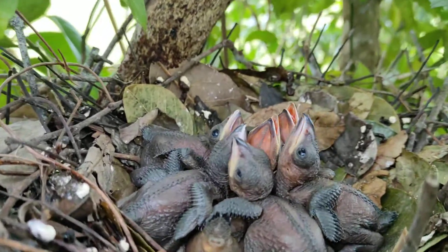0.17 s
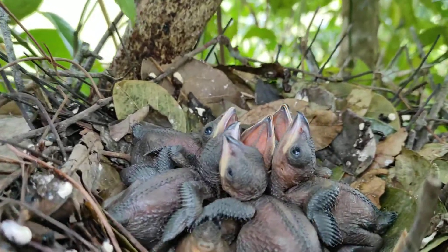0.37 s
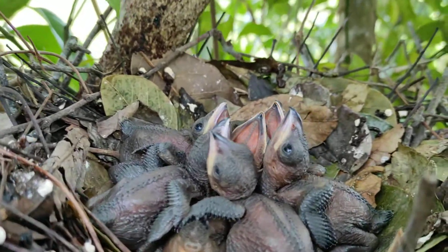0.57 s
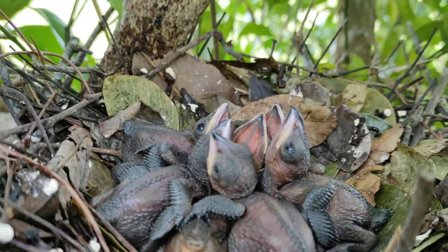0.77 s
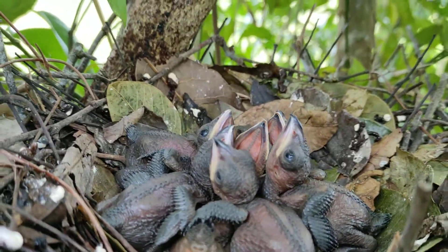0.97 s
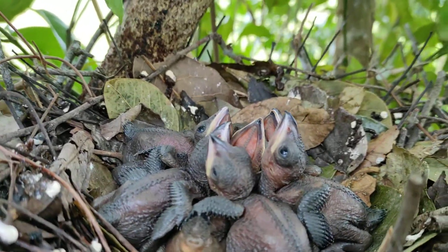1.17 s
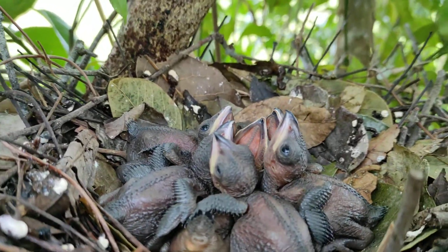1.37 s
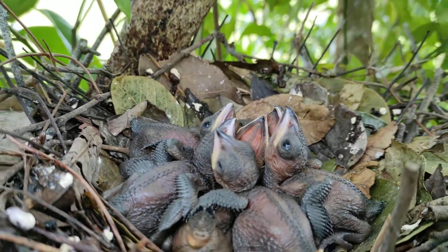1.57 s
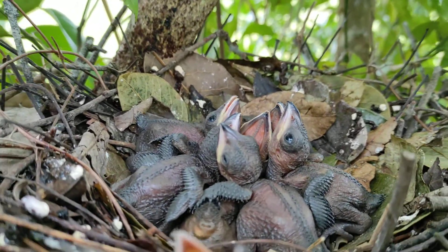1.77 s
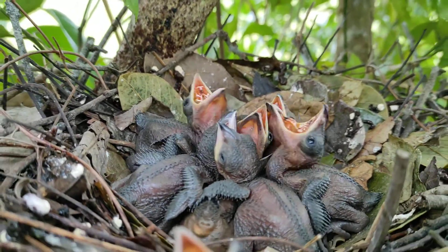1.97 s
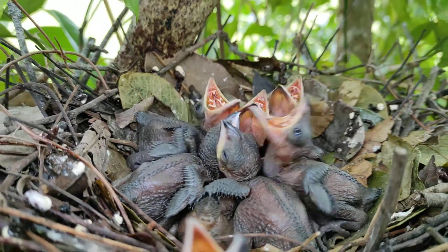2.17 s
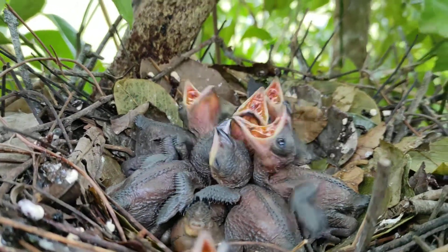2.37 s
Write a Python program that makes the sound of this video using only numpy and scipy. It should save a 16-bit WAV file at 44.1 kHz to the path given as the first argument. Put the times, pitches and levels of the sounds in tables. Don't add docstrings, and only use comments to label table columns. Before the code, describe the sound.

Begging nestlings close to a small camera: a short raspy hiss, a scatter of beak and twig clicks, a stronger hiss with thin rising whistles, then a final loud hiss, over a steady high insect whine outdoors.

```python
import sys
import numpy as np
from scipy import signal
from scipy.fft import rfft, irfft, next_fast_len
from scipy.io import wavfile
from scipy.ndimage import uniform_filter1d, map_coordinates

SR = 44100
rng = np.random.default_rng(int(sys.argv[2]) if len(sys.argv) > 2 else 0)


def attenuation_scalar(level_db):
    decades = np.asarray(level_db, float) / 20
    return 10 ** decades


def pcm_store(signal):
    levels = np.round(np.clip(np.atleast_2d(signal), -1, 1) * 32767)
    wavfile.write(sys.argv[1], SR, levels.astype(np.int16).T)


N = 107118

# t/s, level/dB
FIRST_HISS = [
    (0, -50.5),
    (.14, -51),
    (0.211, -53),
    (0.257, -68),
]
LONG_HISS = [
    (.87, -79),
    (.95, -58.5),
    (1.14, -44),
    (1.3, -46),
    (1.449, -45.5),
    (1.599, -46.5),
    (1.631, -48),
]
LAST_HISS = [
    (2.12, -77),
    (2.134, -56.5),
    (2.16, -50),
    (2.24, -44),
    (2.33, -42.5),
    (2.43, -44),
]
FAINT_HISS = [(0.711, -73.5), (.82, -62.5), (.89, -67.5), (.93, -56), (1.1, -64), (1.2, -58.5),
              (1.299, -59.5), (1.33, -63)]
SHORT_PUFF = [
    (1.99, -90),
    (2.029, -72.5),
    (2.061, -64.5),
    (2.075, -79),
]
HISS_TRIM_DB = [6.43, 3.02, 5.7, 4.2, 3.5]
HISS_RIGHT_TRIM_DB = [2.5, 6.45, 1.3, 11.7, 3.5]
# f/Hz, width/Hz, level/dB
LONG_GAPE = [(1600, 930, -6), (3150, 570, 6.5), (5610, 1400, -3), (7930, 1030, 0.5), (9175, 310, 6),
             (12300, 4300, -10.5)]
COMMON_GAPE = [(1660, 1230, -4), (3184, 860, 0.5), (4890, 750, -9), (8130, 810, -1), (9320, 130, -7),
               (11500, 320, -13)]
FAINT_GAPE = [(1806, 440, -2.5), (3140, 730, -2.5), (5100, 4800, -17)]
# f/Hz, width/Hz, level/dB
LONG_HISS_DIP = (2200, 360, -14)
# f/Hz, level/dB
HISS_RIGHT_DB = [(1000, -8), (3000, -23), (5500, -8.5), (9000, -15.5)]

# f/Hz, level/dB
AIR_COLOUR = [(500, -1.5), (1800, -10.5), (3200, -5.5), (4500, -15.5), (5500, -4), (9000, -3),
              (10200, -11.5), (15000, -12.5)]
# f/Hz, level/dB
AIR_RIGHT_DB = [(30, -12), (300, -16), (4500, -7.5), (9000, -53)]
# t/s, level/dB
SWAY = [
    (0, -60),
    (.3, -61),
    (.75, -66.5),
    (2.05, -64.5),
    (2.43, -55),
]
# f/Hz, level/dB
RUMBLE_COLOUR = [(12, -1.5), (25, -5), (170, -11), (700, -28), (1200, -90)]

# f/Hz, width/Hz, level/dB
CHORUS_PEAKS = [(6850, 419, 7), (6947, 538, 4)]

# t/s, peak level/dB, knock
# level/dB, bright ring level/dB
CLICKS = [(0.0095, -47, -3, -17), (0.063, -41.5, 0.5, -12), (0.2344, -43.5, -8.5, -1), (0.2588, -45, -8, 2),
          (0.2637, -46, -13, -2), (0.3272, -33.5, -15, -9), (0.3312, -31.5, -11, 4.5),
          (0.3328, -35, -11, -5), (0.342, -43.5, -4.5, -9), (0.346, -42.5, -5.5, -5),
          (0.353, -39.5, -14, -2), (0.3747, -46.5, -7.5, 1), (0.4087, -50, -5, -1.5), (0.4136, -48, -7, 1),
          (0.4395, -51, -7.5, 3), (0.4677, -45.5, -7.5, -6), (0.4883, -38.5, -17.5, -12),
          (0.5016, -33.5, -13, -18), (0.503, -37.5, -13, -6.5), (0.5077, -42.5, -8, -1),
          (0.523, -52, -2, -7), (0.5768, -37.5, -11, -7), (0.6082, -35, -23, 3.5), (0.617, -42.5, -4, -18),
          (0.6595, -39.5, -9, -13), (1.6589, -29.5, -9, -18), (1.6627, -28, -21, -7.5),
          (1.6687, -41, 2.5, -23), (1.6826, -43, -2.5, -8), (1.7157, -34.5, -22, -6.5),
          (1.72, -40, -11, -9), (1.776, -49, -6, -4), (1.815, -55.5, -12, -1), (2.055, -58.5, -8, 6)]
# f/Hz, width/Hz, level/dB
BEAK = [(1940, 1280, -3), (3260, 970, -0.5), (5870, 400, -7)]
BRIGHT_TWIG = [(7780, 1120, 12), (8940, 1400, -7)]
NEST_BOWL = [(95, 29.7, -4.5), (181.7, 31, -3), (332, 72, 0.5), (595, 336, -0.5)]

# t/s, f/Hz, level/dB, overtone level/dB
LONG_WHISTLE = [(.675, 656, -82, 6), (0.721, 926.5, -74, 12), (0.755, 1170, -66, 8),
                (.81, 1400, -69.5, 14.5), (0.85, 1650, -59, 6), (0.883, 1775, -53.5, 1.5),
                (.91, 1833, -57, -15), (.975, 1985, -47, -8), (1.001, 2052, -46, -10.5),
                (1.09, 2162, -36.5, -35), (1.142, 2205, -39, -33), (1.18, 2280, -47, -22),
                (1.26, 2357, -48, -28), (1.295, 2460, -47, -18)]
HIGH_WHISTLE = [
    (0.775, 1970, -61, -8),
    (0.811, 2398, -59, -6),
    (0.85, 2985, -53, -12),
    (0.879, 3260, -53.5, -18),
    (0.901, 3600, -41, -34),
    (0.981, 3710, -47, -20),
    (0.999, 3815, -56.5, -32),
    (1.1, 3940, -47, -28),
]
LOW_WHISTLE = [(1.17, 608.2, -78, -0.18), (1.237, 729.6, -62.5, 0.3), (1.265, 690, -66, 0.33),
               (1.294, 693.5, -61.5, .3), (1.329, 649.6, -63, .3), (1.356, 708, -58, 0.26),
               (1.398, 776, -64, 0.2), (1.441, 782.4, -57, 0.21), (1.472, 744, -58.5, 0.31),
               (1.497, 741.7, -58, .3), (1.56, 694, -62, 0.27), (1.593, 623, -66, 0.44),
               (1.62, 556, -66, 0.33)]
CHIRP = [
    (2.134, 9200, -70, 0),
    (2.149, 9900, -57, 0),
    (2.17, 10200, -54, 0),
    (2.19, 9900, -67.5, 0.0037),
]
# multiple of f, level/dB; the first ignores the overtone level
LONG_ORDERS = [(1, 0), (2, -5), (3, -5), (4, -14), (5, -7)]
HIGH_ORDERS = [(1, 0), (1 / 3, -12), (1 / 2, -6), (2 / 3, -10), (3 / 2, -6)]
LOW_ORDERS = [(2, 0), (3, 2), (4, 12), (5, 9), (6, 7), (7, 6), (8, 5)] + [(k, 4) for k in range(10, 13)]
# f/Hz, width/Hz, level/dB
WHISTLE_COLOURS = [
    [(5100, 900, -25), (3200, 700, 6)],
    [],
    [(2340, 160, -22)],
    [],
]
FLICKER_DB = [2.2, 2.6, 2.6, 9]
WAVER = [.003, .005, .007, .03]
WHISTLE_RIGHT_DB = [-8, -14, -18, -11]

# f/Hz, level/dB
AUDIBLE = [(2000, -116), (7400, -108), (8000, -90), (10100, -85), (12400, -94), (13500, -102), (15500, -89)]


def unit(x):
    return x / np.sqrt(np.mean(x ** 2) + 1e-20)


def along(points, hz):
    f, v = np.transpose(points)
    return np.interp(np.log(hz + 1), np.log(f + 1), v)


def curves(rows):
    s, *columns = np.transpose(rows)
    t = np.arange(N) / SR
    since_start = t - s[0] + (s[0] < .01)
    until_end = s[-1] - t + (s[-1] > 2.4)
    gate = np.clip(np.minimum(since_start, until_end) / .012, 0, 1)
    return [gate] + [np.interp(t, s, column) for column in columns]


def wobble(rate):
    knots = rng.standard_normal(int(N * rate / SR) + 4)
    return map_coordinates(knots, [np.arange(N) * rate / SR])


def filtered(x, response):
    m = next_fast_len(N + SR // 4)
    return irfft(rfft(x, m) * response(np.fft.rfftfreq(m, 1 / SR)), m)[..., :N]


def resonant(x, peaks):
    def response(f):
        total = 0
        for k, (center, width, db) in enumerate(peaks):
            damping = 1j * f * width
            total = total + (-1) ** k * attenuation_scalar(db) * damping / (center * center - f * f + damping)
        return total
    return filtered(x, response)


def placed(x, right_db, scatter):
    lag_s = -0.0002884
    leaves = rng.standard_normal(3000) * attenuation_scalar(-60 * np.arange(3000) / 3000)
    far = x + scatter * signal.fftconvolve(x, leaves / np.linalg.norm(leaves))[:N]
    far = filtered(far, lambda hz: attenuation_scalar(along(right_db, hz)) * np.exp(-2j * np.pi * hz * lag_s))
    return 1.926 * np.array([x, far / np.hypot(1, scatter)])


def hisses():
    rasp_hz, rasp_drift, rasp_jitter, rasp_share = 720, .07, .07, .45
    voiced_share, voiced_jitter = 1.3, .018
    takes = [FIRST_HISS, LONG_HISS, LAST_HISS, FAINT_HISS, SHORT_PUFF]
    gapes = [COMMON_GAPE, LONG_GAPE, COMMON_GAPE, FAINT_GAPE, COMMON_GAPE]
    out = 0
    for rows, gape, trim_db, right_trim_db in zip(takes, gapes, HISS_TRIM_DB, HISS_RIGHT_TRIM_DB):
        gate, effort_db = curves(rows)
        voiced, low_hz = curves(LOW_WHISTLE)[:2]
        voiced = voiced * (rows is LONG_HISS)
        loose_hz = rasp_hz * (1 + rasp_drift * wobble(14) + rasp_jitter * wobble(300))
        locked_hz = low_hz * (1 + voiced_jitter * wobble(200))
        phase = 2 * np.pi * np.cumsum(np.where(voiced > .5, locked_hz, loose_hz)) / SR
        pulses = np.exp(60 * (np.cos(phase) - 1))
        slaps = unit(np.diff(pulses, prepend=0)) * attenuation_scalar(2 * wobble(40))
        breath = rng.standard_normal(N) + (rasp_share + voiced_share * voiced) * slaps
        breath = breath / np.hypot(1, voiced_share * voiced) * attenuation_scalar(0.72 * wobble(40.04))
        breath = filtered(resonant(breath, gape),
                          lambda hz: 1 / (1 + (850 / (hz + 1)) ** 4) / (1 + (hz / 13500) ** 12))
        if rows is LONG_HISS:
            center, width, dip_db = LONG_HISS_DIP
            breath = filtered(breath, lambda hz: attenuation_scalar(dip_db * np.exp(-((hz - center) / width) ** 2)))
        hiss = gate * attenuation_scalar(effort_db + trim_db) * unit(breath)
        out = out + placed(hiss, HISS_RIGHT_DB, scatter=3.2) * attenuation_scalar([[0], [right_trim_db]])
    return out


def air():
    air_db = -68

    def shaded(x, colour):
        return filtered(x, lambda hz: attenuation_scalar(along(colour, hz)) * [1 + 0 * hz, attenuation_scalar(along(AIR_RIGHT_DB, hz))])

    def leveled(x):
        return x / np.sqrt(np.mean(x[0] ** 2))

    leaves = shaded(rng.standard_normal((2, N)) * attenuation_scalar(0.27 * wobble(24.0)), [(100, 2)] + AIR_COLOUR)
    lumps = attenuation_scalar(3.8 * np.array([wobble(42.97), wobble(11.34)]))
    rumble = shaded(rng.standard_normal((2, N)) * lumps, RUMBLE_COLOUR)
    sway_db = curves(SWAY)[1]
    return attenuation_scalar(air_db + 10) * leveled(leaves) + attenuation_scalar(sway_db + 8.0) * leveled(rumble)


def chorus():
    chorus_db, octave_db, buckles_hz = -49, -31, 235.5
    crowd = []
    for side in range(2):
        beat = np.cos(2 * np.pi * np.cumsum(buckles_hz * (1 + 0.099 * wobble(30))) / SR)
        drive = rng.standard_normal(N) * (1 + 0.15 * beat)
        song = unit(resonant(resonant(drive, CHORUS_PEAKS), [(6480, 2600, 0)]))
        octave = unit(resonant(song ** 2, [(12700, 480, 0)]))
        crowd.append((song + attenuation_scalar(octave_db) * octave) * attenuation_scalar(.9 * wobble(6)))
    return attenuation_scalar(chorus_db) * attenuation_scalar([[4.5], [.5]]) * np.array(crowd)


def clicks():
    snap_s, rise_s = .0055, .0008
    settle_db, settle_s = -23, 0.11
    knock_lag_s, knock_s, knock_hz = .0022, 0.032, 240
    snap, bright, knock = np.zeros((3, N))
    t = np.arange(4000) / SR
    for s, db, knock_db, bright_db in CLICKS:
        i, j = round(s * SR), round((s + knock_lag_s) * SR)
        grit, thud_grit, grains = rng.standard_normal((3, len(t)))
        held_grains = np.repeat(grains, 50)[:len(t)]
        settle = attenuation_scalar(settle_db - 60 * t / settle_s + 2.8 * held_grains)
        attack = attenuation_scalar(-60 * t / snap_s) * (1 - np.exp(-t / rise_s)) * 1.93
        crackle = grit * (attack + settle)
        thud = (0.72 + thud_grit) * np.sin(2 * np.pi * knock_hz * t) * attenuation_scalar(-60 * t / knock_s) / 2.84
        snap[i:i + len(t)] += attenuation_scalar(db) * crackle
        bright[i:i + len(t)] += attenuation_scalar(db + bright_db) * crackle
        knock[j:j + len(t)] += attenuation_scalar(db + knock_db) * thud
    body = attenuation_scalar(12.0) * resonant(snap, BEAK)
    body += attenuation_scalar(10.0) * resonant(bright, BRIGHT_TWIG)
    body += attenuation_scalar(25) * resonant(knock, NEST_BOWL)
    body = filtered(body, lambda hz: 1 / (1 + 1j * (hz / 9600) ** 9) + .1)
    return placed(body, [(200, -38.0), (3000, -30.0), (7000, -47)], scatter=0.58)


def whistles():
    glides = [LONG_WHISTLE, HIGH_WHISTLE, LOW_WHISTLE, CHIRP]
    stacks = [LONG_ORDERS, HIGH_ORDERS, LOW_ORDERS, [(0.97, 0)]]
    out = 0
    for rows, orders, shading, flicker_db, waver, right_db in zip(
            glides, stacks, WHISTLE_COLOURS, FLICKER_DB, WAVER, WHISTLE_RIGHT_DB):
        gate, hz, level_db, over_db = curves(rows)
        phase = 2 * np.pi * np.cumsum(hz * (1 + waver * wobble(90))) / SR
        voice = 0
        for i, (k, db) in enumerate(orders):
            colour = sum(c_db * np.exp(-((k * hz - c) / w) ** 2) for c, w, c_db in shading)
            depth_db = flicker_db * (.5 + (i > 0) + (k > 9))
            flicker = depth_db * np.clip(wobble(130), -3, 1.5)
            voice = voice + attenuation_scalar(db + over_db * (i > 0) + colour + flicker) * np.sin(k * phase)
        out = out + placed(gate * attenuation_scalar(level_db) * voice, [(2000, right_db)], scatter=0.91)
    return out


def masked(x):
    mask_db, chance_db, frame_lead = -4.6, 4.4, 392
    frames = dict(fs=SR, nperseg=2048, noverlap=1024, window="cosine")
    hz, t, z = signal.stft(np.pad(x, [(0, 0), (frame_lead, 0)]), **frames)
    power = (abs(z[:, :1024]) ** 2).reshape(2, 128, 8, -1).mean(axis=2)
    hz = hz[4:1024:8, None]
    neighbours = uniform_filter1d(power ** .25, size=13, axis=1) ** 4
    hidden = neighbours * attenuation_scalar(2 * mask_db) + attenuation_scalar(2 * along(AUDIBLE, hz))
    chance = unit(uniform_filter1d(rng.standard_normal(power.shape), size=3, axis=2))
    kept = (power * attenuation_scalar(2 * chance_db * chance) > hidden) | (hz < 2200)
    z[:, :1024] *= np.repeat(kept, 8, axis=1)
    return signal.istft(z, **frames)[1][:, frame_lead:][:, :N]


def scene():
    return hisses() + air() + chorus() + clicks() + whistles()


def top_cut(x):
    return signal.sosfilt(signal.butter(12, 15750, fs=SR, output="sos"), x)


def record(dry):
    top_hz = 15800
    mix = masked(filtered(dry, lambda hz: (hz < top_hz) * hz / (hz + 15)))
    return top_cut(mix)


dry = scene()
out = record(dry)
pcm_store(out)
```